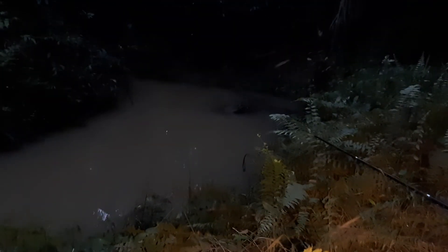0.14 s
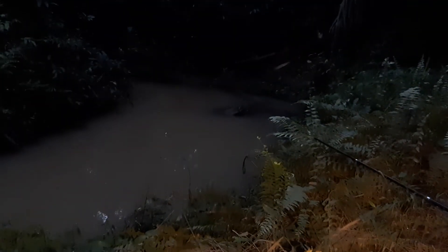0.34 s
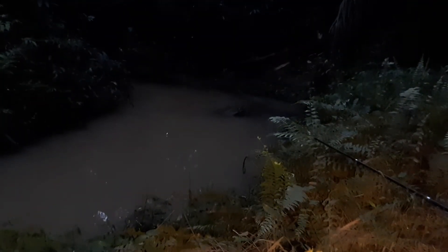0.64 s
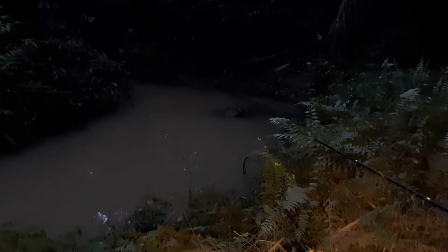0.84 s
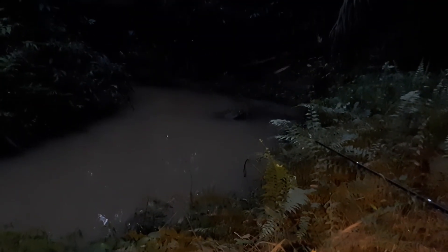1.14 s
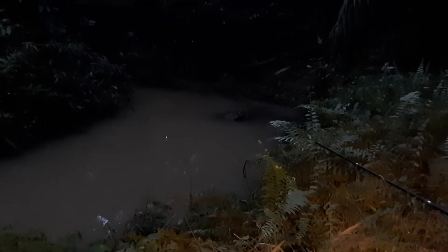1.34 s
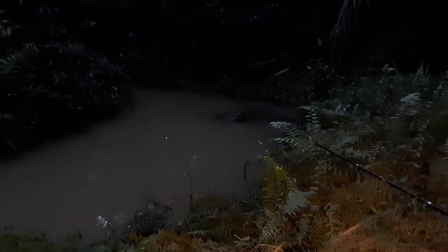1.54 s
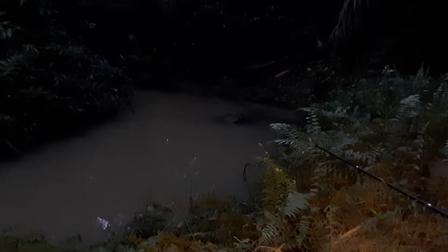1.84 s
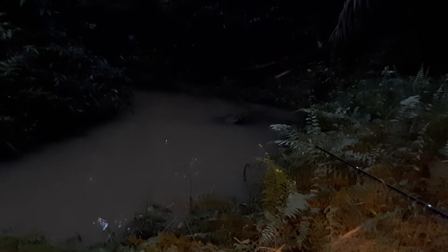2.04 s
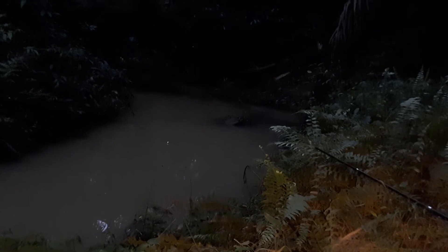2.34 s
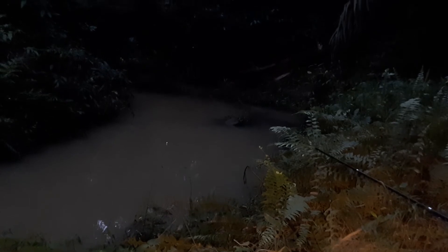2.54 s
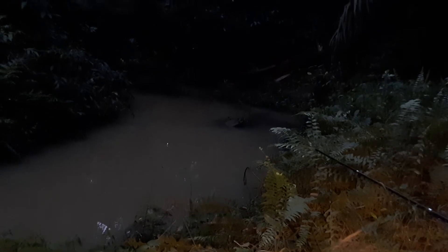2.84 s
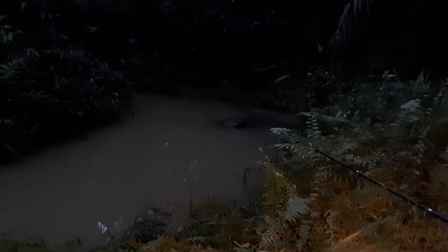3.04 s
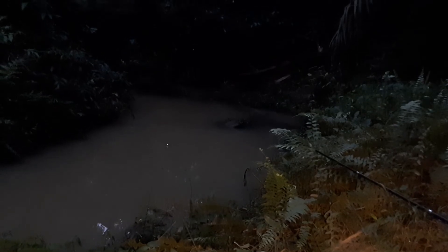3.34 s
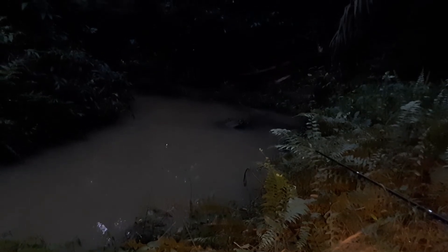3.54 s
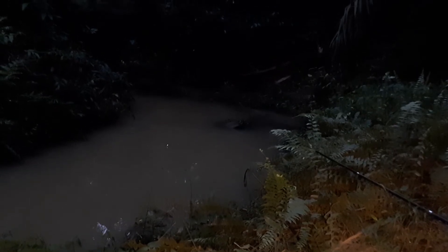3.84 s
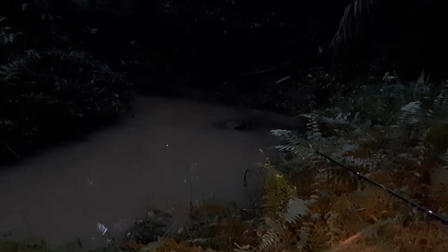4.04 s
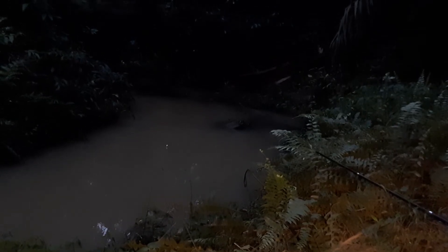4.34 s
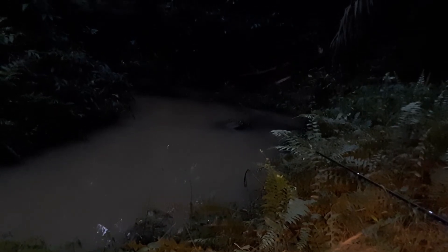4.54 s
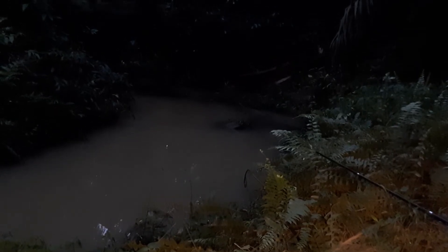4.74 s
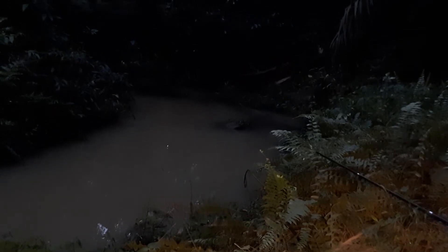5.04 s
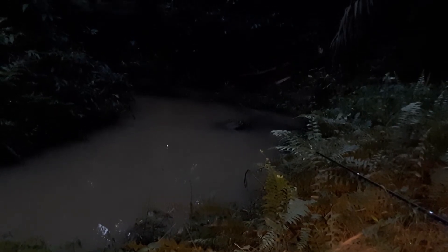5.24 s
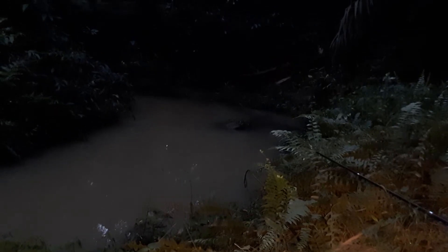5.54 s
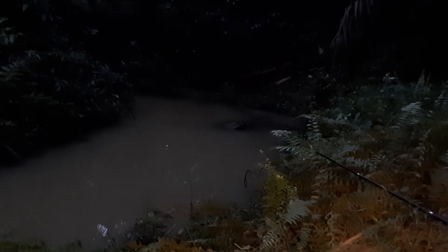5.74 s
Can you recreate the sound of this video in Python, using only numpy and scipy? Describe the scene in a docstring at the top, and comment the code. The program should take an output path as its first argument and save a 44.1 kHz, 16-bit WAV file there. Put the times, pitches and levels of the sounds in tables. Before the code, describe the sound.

Insects drone steadily throughout, a mid-pitched buzz outdoors at night beside a slow stream. Above it is a softer, high cricket chorus, with thin trills, ticks and chirps scattered left and right. A very faint wash of water and a distant low rumble lie underneath. From about 1.0 to 1.9 seconds an animal, perhaps a bird, scolds with six quick, harsh, evenly spaced rasps, the loudest event, leaving a reverberant tail. A short frog-like two-note yelp comes softly at 2.3 seconds, again at 3.3 and 3.7, then from about 4.1 repeats five or six times a second, growing louder until the end near 6 seconds. Faint falling peeps occur around 0.5 and 3.5 seconds, and a second caller adds tiny rising chirps near 4.9, 5.5 and 5.7. The drone swells slightly at the end. Every call echoes briefly among trunks and leaves.

```python
"""Night by a plantation stream

Over a faint rumble and the wash of slow water, insects drone as pulse trains excite their resonators.
Crickets trill and chirp above them by stridulation, drawing a file over a scraper. An animal, perhaps
a bird, scolds in six harsh rasps of shaped noise; later a frog-like two-note yelp repeats and grows
louder. Scattering by trunks and leaves gives every call a reverberant tail."""
import sys
import numpy as np
from scipy import signal
from scipy.fft import rfft, irfft, next_fast_len
from scipy.io import wavfile

SR = 44100
rng = np.random.default_rng(int(sys.argv[2]) if len(sys.argv) > 2 else 0)


def wav_out(sig):
    """Save sig, one row per channel (or a flat mono array), as 16-bit PCM at SR to the path in sys.argv[1]."""
    wavfile.write(sys.argv[1], SR, np.round(np.clip(np.atleast_2d(sig).T, -1, 1) * 32767).astype(np.int16))


N = 260190
TIME = np.arange(N) / SR


def from_db(db):
    """Amplitude grows tenfold for every 20 dB."""
    return 10 ** (np.asarray(db) / 20)


def rms_one(x):
    """Normalisation to unit mean power."""
    return x / np.sqrt(np.mean(x ** 2) + 1e-20)


def pan(db):
    """Interaural level difference at constant power; positive is to the left."""
    return rms_one(from_db([[db / 2], [-db / 2]]))


def from_side(x, pan_db, lag_s):
    """Interaural level and time differences: the left ear lags by lag_s."""
    return pan(pan_db) * np.array([np.interp(TIME - lag_s, TIME, x), x])


def add(track, start_s, sound):
    """Superposition of a short sound on a track."""
    start = max(round(start_s * SR), 0)
    track[start:start + len(sound)] += sound[:max(N - start, 0)]


def swell(curve):
    """Amplitude envelope, linear in decibels between the points of a curve."""
    return from_db(np.interp(TIME, *np.transpose(curve)))


def drift(per_s, size=N):
    """Random modulation: about per_s changes a second, with a spread near 1."""
    knots = rng.standard_normal(size // 10 + 2)
    return np.interp(TIME[:size] * per_s, np.arange(len(knots)), knots)


def coloured(x, spectrum):
    """Spectral shaping by a gain curve in decibels over log frequency."""
    hz, db = np.transpose(spectrum)
    size = next_fast_len(x.shape[-1])
    bin_hz = np.maximum(np.arange(size // 2 + 1) * SR / size, 1)
    gain = from_db(np.interp(np.log(bin_hz), np.log(hz), db, left=-120, right=-120))
    return irfft(rfft(x, size) * gain, size)[..., :x.shape[-1]]


def diffuse(spectrum):
    """A diffuse field: noise of unit power, uncorrelated at the two ears."""
    return rms_one(coloured(rng.standard_normal((2, N)), spectrum))


def tone(hz):
    """A sine of unit power whose phase is the integral of its frequency."""
    return np.sqrt(2) * np.sin(2 * np.pi * np.cumsum(hz) / SR)


def echoes(x, t60_s, build_s):
    """Scattering: reflections off trunks and leaves build up, then decay exponentially."""
    t = TIME[:SR]
    envelope = from_db(-60 * t / t60_s) * (1 - np.exp(-(t / build_s) ** 2))
    response = rms_one(rng.standard_normal((2, SR)) * envelope) / np.sqrt(SR)
    return signal.fftconvolve(x[None], response, axes=1)[:, :N]


def strokes(cycles, hz, fall, duty):
    """Stridulation: each wing closing draws a file over a scraper; pitch sags by the fraction fall."""
    closing = np.minimum(cycles % 1 / duty, 1)
    return rms_one(np.sin(np.pi * closing) * tone(hz * (1 + fall * (.5 - closing))))


def chirps(runs, hz, fall, per_s, pan_db, echo_db, scratch=.013, uneven_db=4):
    """Runs of uneven stridulation; the ratio of echo to direct sound conveys distance."""
    song = np.zeros(N)
    for start_s, length_s, db in runs:
        size = round(length_s * SR)
        pace, teeth, force = [drift(rate, size=2 * SR)[:size] for rate in (40, 1500, 35)]
        cycles = np.cumsum(per_s * (1 + .06 * pace)) / SR
        pitch_hz = hz * (1 + scratch * teeth + .6 * fall ** 2 * pace)
        run = from_db(db + uneven_db * force) * strokes(cycles, pitch_hz, fall, duty=.68)
        add(song, start_s, run * signal.windows.tukey(size, .1))
    return pan(pan_db) * song + from_db(echo_db) * echoes(song, t60_s=.34, build_s=.009)


def whistle(length_s, start_hz, end_hz, hoarse=.029, overtone=0):
    """A soft-edged linear glide, made hoarse by random frequency modulation."""
    progress = np.linspace(0, 1, round(length_s * SR))
    jitter = 1 + hoarse * drift(900, size=SR)[:len(progress)]
    hz = (start_hz + (end_hz - start_hz) * progress) * jitter
    return np.sin(np.pi * progress) * (tone(hz) + overtone * tone(2 * hz))


# Spectrum of the far rumble: frequency_hz, gain_db
RUMBLE_SPECTRUM = [(20, -32.5), (35, -12.5), (48, -7.5), (62, 1.5), (80, -3), (120, -11.5), (200, -22.5),
                   (400, -32), (900, -65)]
# Its swell: time_s, level_db
RUMBLE_SWELL = [(0, -74.5), (1.6, -70), (2.36, -73.5), (2.81, -65.5), (3.6, -72), (4.2, -74.5), (5.3, -70),
                (5.9, -71)]


def rumble():
    """Coherent low noise from afar reaches both ears in phase."""
    noise = rms_one(coloured(rng.standard_normal(N), RUMBLE_SPECTRUM))
    return swell(RUMBLE_SWELL) * pan(-5.5) * noise


# Spectra of the water and of the night's high hiss: frequency_hz, gain_db
WATER_SPECTRUM = [(40, -9), (120, 10.5), (250, 6), (500, 0.5), (900, -1), (4000, -12.5), (10000, -37)]
HISS_SPECTRUM = [(8000, -19), (10300, -15.5), (11500, -7.5), (12700, -8), (14000, -1), (16000, -2)]


def stream_and_hiss(water_db=-78, hiss_db=-73):
    """Two diffuse fields: a steady hiss, and even water that washes up twice."""
    for peak_s, half_length_s, rise_db in (1.55, .51, 5.2), (4.88, .16, 6.3):
        water_db = water_db + rise_db * np.exp(-((TIME - peak_s) / half_length_s) ** 2)
    water = from_db(water_db) * pan(-2) * diffuse(WATER_SPECTRUM)
    return water + from_db(hiss_db) * diffuse(HISS_SPECTRUM)


# Spectrum of the distant crickets: frequency_hz, gain_db
CHORUS_SPECTRUM = [(3200, -24), (4000, -15.5), (4400, -4), (5000, -3), (5900, 0), (6400, -15), (7050, -4.5),
                   (7500, -11), (8100, -6), (8800, -14), (9300, -28.5), (10500, -37.5)]


def cricket_chorus(level_db=-57):
    """Incoherent summation: distant crickets merge into a wavering band of noise."""
    return from_db(level_db + 1.3 * drift(10)) * pan(-2.5) * diffuse(CHORUS_SPECTRUM)


# Faint pips in the undergrowth: rate_per_s, pitch_hz, spread_fraction, fall_fraction, length_s, level_db
PIP_KINDS = [(50, 4950, 0.0599, 0.166, 0.0222, -65.5), (18.1, 2740, .04, 0.064, .03, -67.5)]


def pips(uneven_db=3, echo_db=6):
    """A random point process: distant callers pip at log-normal intervals, each pip sagging in pitch."""
    calls = np.zeros(N)
    for per_s, hz, spread, fall, length_s, db in PIP_KINDS:
        draws = rng.standard_normal((300, 3))
        starts = np.cumsum(np.exp(.5 * draws[:, 0])) / per_s
        progress = np.linspace(0, 1, round(length_s * SR))
        for start_s, (_, detune, force) in zip(starts[starts < N / SR], draws):
            pitch_hz = hz * (1 + spread * detune) * (1 + fall * (.5 - progress))
            envelope = from_db(db + uneven_db * force) * np.sin(np.pi * progress)
            add(calls, start_s, envelope * tone(pitch_hz))
    return pan(-4.5) * (calls + from_db(echo_db) * echoes(calls, t60_s=.36, build_s=.0075))


# Nearer crickets that never pause: pitch_hz, fall_fraction, strokes_per_s, level_db, pan_db
TRILLERS = [(6970, .06, 44, -65.5, 3), (7080, .04, 51, -66, -9)]


def trills(unsteady=.091, echo_db=-2, swell_db=2.5):
    """Continuous stridulation, randomly modulated in pace, pitch and strength."""
    out = 0
    for hz, fall, per_s, db, pan_db in TRILLERS:
        cycles = np.cumsum(per_s * (1 + unsteady * drift(20))) / SR
        song = strokes(cycles, hz * (1 + .0049 * drift(40)), fall, duty=.66)
        song *= from_db(swell_db * (drift(30) + drift(2.85)))
        heard = song + from_db(echo_db) * echoes(song, t60_s=.96, build_s=.0045)
        out = out + from_db(db) * pan(pan_db) * rms_one(heard)
    return out


def periodic_insects():
    """Periodic stridulation: a thin whine and a pure, fast trill each recur at a fixed interval."""
    whines = [(s, .3, -81.5) for s in np.arange(.54, N / SR, .803)]  # start_s, length_s, level_db
    bouts = [(s, .43, -71) for s in np.arange(.12, N / SR, .93)]
    whine = chirps(whines, hz=13870, fall=.006, per_s=100, pan_db=0, echo_db=-3,
                   scratch=.004, uneven_db=2)
    trill = chirps(bouts, hz=7240, fall=.0058, per_s=89, pan_db=-14.5, echo_db=1.5,
                   scratch=.004, uneven_db=3)
    return whine + trill


# Runs of wing strokes: start_s, length_s, level_db
STEEP_SWEEPS = [(0, 0.11, -61), (.23, .14, -62.5), (.78, 0.17, -64), (1.97, 0.68, -70), (3.18, 0.16, -78),
                (3.78, .11, -61.5), (4.01, 0.16, -57), (4.22, 0.32, -58.5)]  # a cricket on the right
FAST_BUZZES = [(.6, 0.94, -70.5), (1.36, 0.4, -63.5)]  # soft at first, then a step up
FAR_TRILL = [(3.85, 1.0, -72)]  # slow and low
# Short chirps: start_s, level_db
CLEAR_FLICKS = [(0.458, -73), (.672, -66), (3.38, -64.5), (3.6, -63)]  # a nearer cricket
LEFT_TICKS = [(1.157, -57), (2.597, -64.5), (2.935, -59), (3.743, -59), (4.79, -59), (4.92, -66),
              (5.737, -58)]
HIGH_LISPS = [(.798, -69), (1.036, -69), (1.27, -69), (4.19, -67), (4.418, -69)]


def solo_insects(flick_s=.1, tick_s=.077, lisp_s=.057):
    """Source segregation: six insects stand out, each by its own pitch, stroke rate and place."""
    flicks = [(s, flick_s, db) for s, db in CLEAR_FLICKS]
    ticks = [(s, tick_s, db) for s, db in LEFT_TICKS]
    lisps = [(s, lisp_s, db) for s, db in HIGH_LISPS]
    return (chirps(STEEP_SWEEPS, hz=5090, fall=.27, per_s=31, pan_db=-20, echo_db=2, scratch=.01)
            + chirps(flicks, hz=4700, fall=.17, per_s=32, pan_db=-4, echo_db=0,
                     scratch=.0046, uneven_db=1.5)
            + chirps(ticks, hz=8430, fall=.109, per_s=53, pan_db=17, echo_db=-3, uneven_db=0)
            + chirps(lisps, hz=14850, fall=.06, per_s=44, pan_db=5, echo_db=-1, scratch=.02)
            + chirps(FAST_BUZZES, hz=8310, fall=.068, per_s=150, pan_db=17, echo_db=.5)
            + chirps(FAR_TRILL, hz=3420, fall=.18, per_s=16, pan_db=-11, echo_db=11.5))


# Spectrum of the distant droning insects: frequency_hz, gain_db
DRONE_SPECTRUM = [(850, -68.5), (1100, -31.5), (1300, -20.5), (1430, -12), (1520, 5), (1630, 3), (1740, -5),
                  (1900, -12.5), (2200, -19.5), (2800, -27), (3500, -24.5), (4000, -36), (5000, -64)]
# The nearest droning insects: pulses_per_s, relative_db, pan_db
NEAR_DRONERS = [(101.85, -7, -6), (95.0, -8, -4)]
# Swell of the whole drone: time_s, level_db
DRONE_SWELL = [(0, -36.5), (1.5, -37), (2.9, -38), (3.11, -36), (3.3, -38), (4.68, -37), (5.9, -34)]


def drone(body_hz=1580, width_hz=330, wander=.003032, far_db=-3):
    """Forced resonance: pulse trains ring each insect's body; the far ones blur into a band."""
    out = from_db(far_db) * pan(-4.5) * diffuse(DRONE_SPECTRUM)
    body = signal.iirpeak(body_hz, body_hz / width_hz, fs=SR)
    # A small body radiates one narrow band.
    radiation = signal.butter(3, [1490, 1830], "band", fs=SR, output="sos")
    for per_s, db, pan_db in NEAR_DRONERS:
        cycles = np.cumsum(per_s * (1 + wander * drift(25))) / SR
        pulses = np.diff(np.floor(cycles), prepend=0) * from_db(3.8 * drift(60))
        ringing = signal.lfilter(*body, signal.lfilter(*body, pulses))
        buzz = rms_one(signal.sosfilt(radiation, ringing))
        scattered = from_db(-6) * echoes(buzz, t60_s=.28, build_s=.011)
        heard = from_side(buzz, pan_db=0, lag_s=.00036) + scattered
        out = out + from_db(db) * pan(pan_db) * rms_one(heard)
    return swell(DRONE_SWELL) * out


# Stray falling peeps: start_s, length_s, level_db
FALLING_PEEPS = [(0.324, 0.067, -60), (.466, 0.032, -68), (0.596, .06, -69), (3.348, 0.038, -56.5),
                 (3.529, 0.081, -59)]
# Upward whits of a second caller answering the yelps: start_s, level_db
RISING_WHITS = [(4.913, -48.5), (5.532, -44.5), (5.745, -54)]
# Thin, very high squeaks: start_s, length_s, start_hz, end_hz, level_db
HIGH_SQUEAKS = [(1.845, 0.27, 11800, 12200, -80), (2.057, 0.099, 12200, 13700, -74),
                (4.85, 0.038, 12400, 12700, -68), (4.88, .05, 13600, 13400, -62),
                (4.916, 0.033, 13600, 10300, -64), (4.95, .16, 13600, 12400, -75)]


def small_animals(echo_db=1.5):
    """Brief frequency glides, half lost in the reverberation of the trees."""
    calls = np.zeros(N)
    for start_s, length_s, db in FALLING_PEEPS:
        add(calls, start_s, from_db(db) * whistle(length_s, start_hz=3000, end_hz=2605))
    for start_s, db in RISING_WHITS:
        add(calls, start_s, from_db(db) * whistle(length_s=.018, start_hz=2620, end_hz=2980))
    for start_s, length_s, start_hz, end_hz, db in HIGH_SQUEAKS:
        add(calls, start_s, from_db(db) * whistle(length_s, start_hz, end_hz, hoarse=.022))
    return pan(-2.5) * (calls + from_db(echo_db) * echoes(calls, t60_s=.28, build_s=.004))


# Two-note yelps, hesitant at first and then in a steady series: start_s
YELP_STARTS = [2.284, 3.263, 3.7235, 4.0777, 4.2838, 4.4868, 4.6686, 4.8258, 5.026, 5.1854, 5.3665, 5.5443,
               5.6988, 5.8662]
# The caller works up to full voice: time_s, upper_note_db, lower_note_db
VOCAL_EFFORT = [(2.28, -55.5, -51), (3.7, -63, -52.5), (4.5, -49, -41), (4.85, -45, -40.5),
                (5.87, -42.5, -40.5)]


def yelps(lower_delay_s=.013, upper_echo_db=6, lower_echo_db=-7):
    """Vocal effort sets the amplitude of a quick upward glide and a lower note, both echoing."""
    upper, lower = np.zeros(N), np.zeros(N)
    time_s, upper_db, lower_db = np.transpose(VOCAL_EFFORT)
    for start_s in YELP_STARTS:
        glide = whistle(length_s=.01905, start_hz=2185, end_hz=2845, overtone=.17)
        note = whistle(length_s=.031, start_hz=2057, end_hz=2025, hoarse=.032, overtone=.13)
        add(upper, start_s - .005, from_db(np.interp(start_s, time_s, upper_db)) * glide)
        add(lower, start_s + lower_delay_s, from_db(np.interp(start_s, time_s, lower_db)) * note)
    ringing = signal.lfilter(*signal.iirpeak(2560, Q=9, fs=SR), upper)
    tails = from_db(upper_echo_db) * echoes(ringing, t60_s=.63, build_s=.0055)
    tails += from_db(lower_echo_db) * echoes(lower, t60_s=.28, build_s=.025)
    return from_side(upper + lower, pan_db=-2.7, lag_s=-.00043) + pan(-3) * tails


# Harsh scolding rasps: start_s, relative_db
SCOLDS = [(1.033, -27.5), (1.1826, -27), (1.3374, -25.5), (1.491, -26.5), (1.6682, -27), (1.8313, -27.5)]
# Spectrum of a rasp: frequency_hz, gain_db
RASP_SPECTRUM = [(500, -69), (1100, -15), (1900, -3), (2400, -11.5), (2700, -6), (3450, -0.5), (4300, -6),
                 (5100, -17.5), (6400, -23.5), (9200, -31.5), (10000, -23.5), (10800, -25.5),
                 (11600, -32.5), (12300, -37)]


def rasps(rise_s=.00091, hold_s=.025, trail_s=.033, gain_db=-8, trail_db=-5, alike=.88):
    """Source and filter: each rasp is a rough noise burst and a softer buzz narrowed by the throat."""
    t = TIME[:SR // 4]
    burst_envelope = (1 - np.exp(-t / rise_s)) * np.exp(-(t / hold_s) ** 3)
    trail_envelope = from_db(trail_db) * (t / trail_s * np.exp(1 - t / trail_s)) ** 4
    bursts, trails = np.zeros(N), np.zeros(N)
    shared_grain = rng.standard_normal(len(t))  # makes the rasps much alike
    for start_s, db in SCOLDS:
        grain = np.sqrt(alike) * shared_grain + np.sqrt(1 - alike) * rng.standard_normal(len(t))
        voice = from_db(db + gain_db) * rms_one(coloured(grain, RASP_SPECTRUM))
        add(bursts, start_s, voice * burst_envelope)
        add(trails, start_s, voice * trail_envelope)
    throat = signal.butter(2, [2925, 3875], "band", fs=SR)
    call = bursts + signal.lfilter(*throat, trails)
    near_echoes = from_db(-3) * echoes(signal.lfilter(*throat, call), t60_s=.24, build_s=.029)
    far_echoes = from_db(-4) * echoes(call, t60_s=1.1, build_s=.0066)
    return from_side(call, pan_db=2.3, lag_s=-.0004205) + near_echoes + far_echoes


def scene():
    """Linear superposition of the insects, the callers and the background."""
    insects = cricket_chorus() + drone() + trills() + solo_insects() + periodic_insects() + pips()
    return insects + rasps() + yelps() + small_animals() + rumble() + stream_and_hiss()


def record(dry, cutoff_hz=15800):
    """Band limiting: an elliptic low-pass filter cuts the highest treble steeply."""
    return signal.sosfilt(signal.ellip(12, .1, 80, cutoff_hz, fs=SR, output="sos"), dry)


dry = scene()
out = record(dry)
wav_out(out)
```